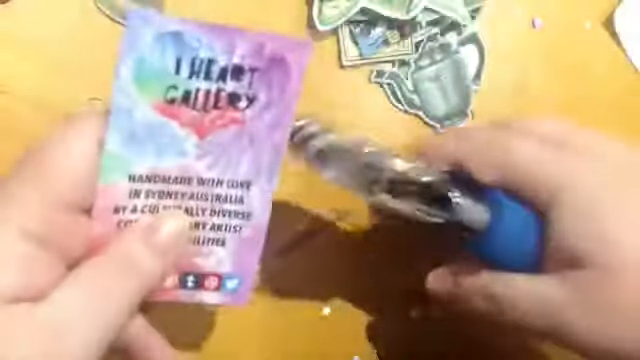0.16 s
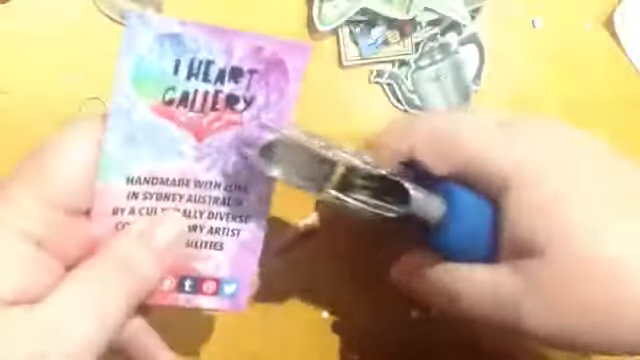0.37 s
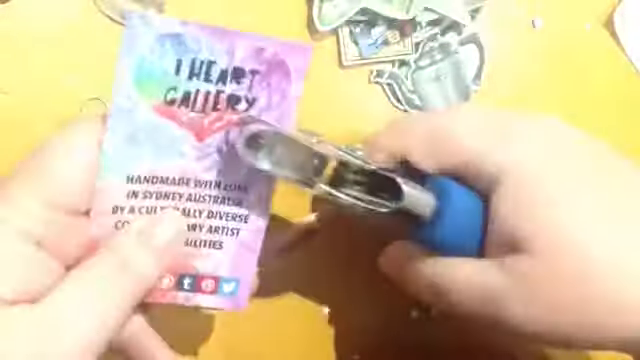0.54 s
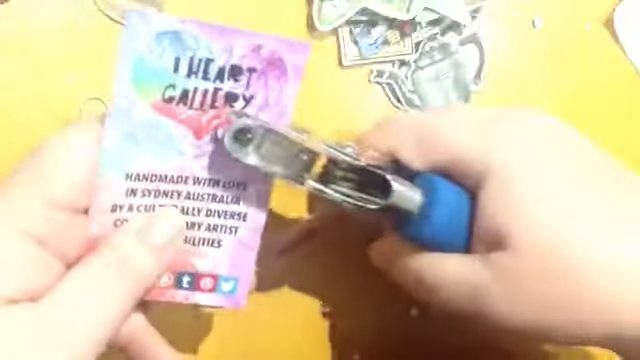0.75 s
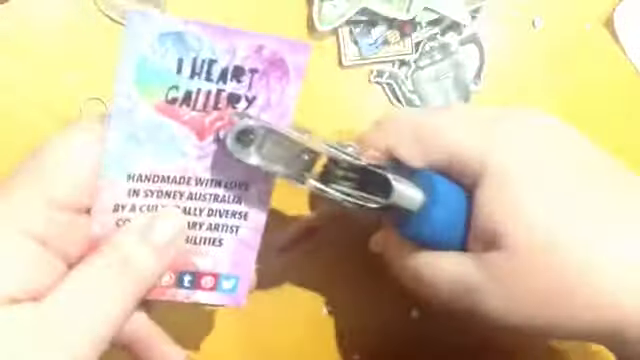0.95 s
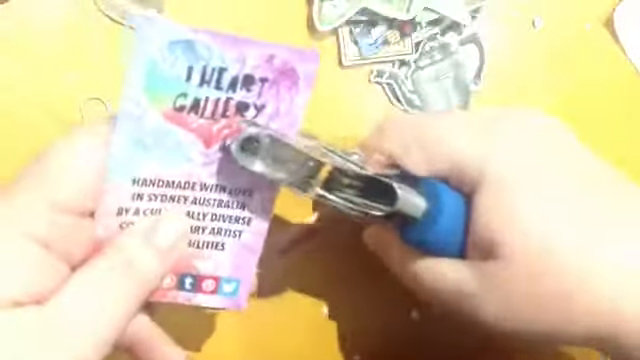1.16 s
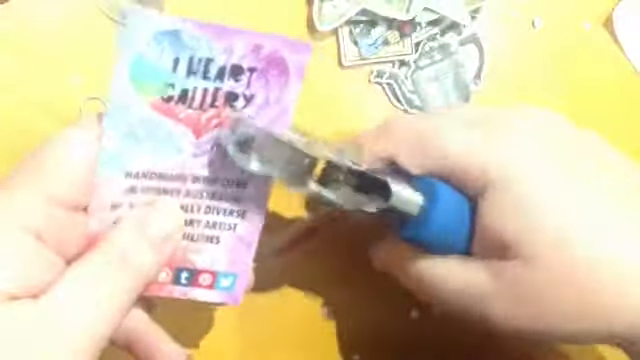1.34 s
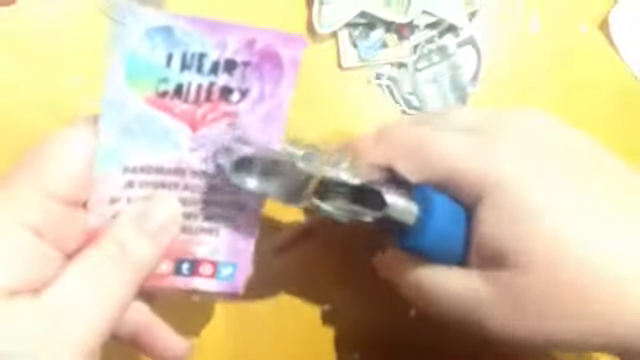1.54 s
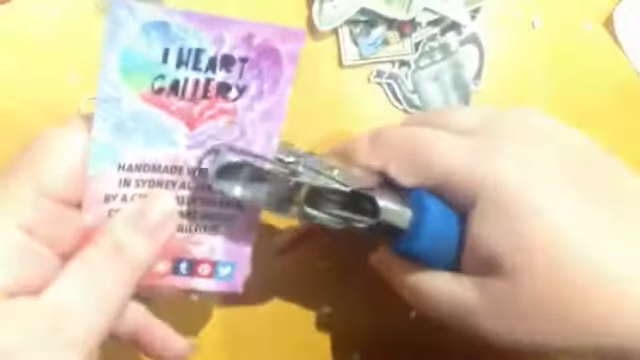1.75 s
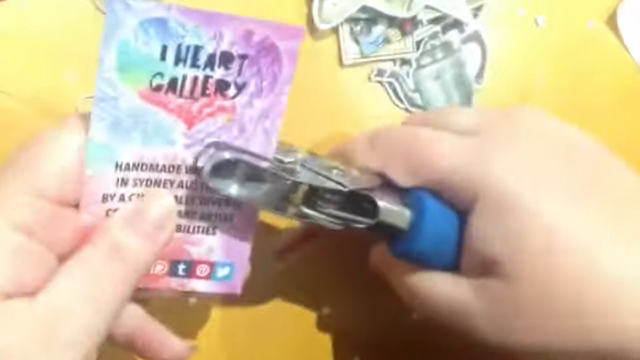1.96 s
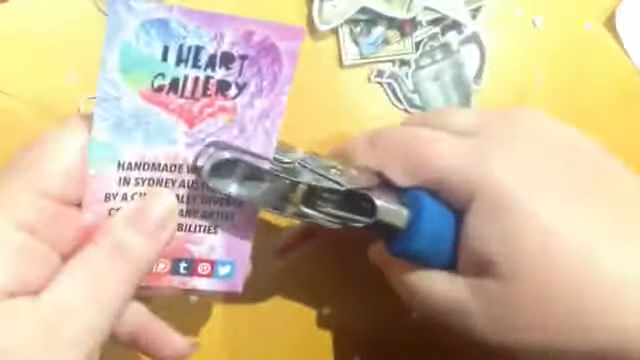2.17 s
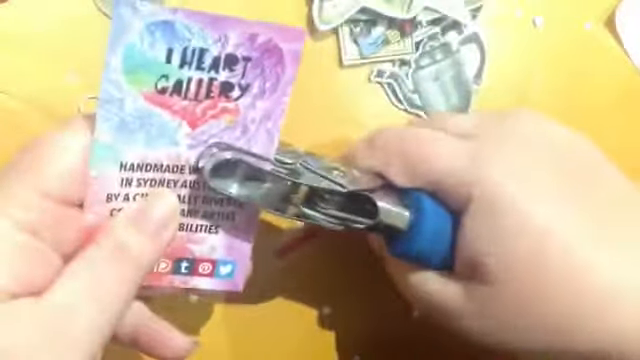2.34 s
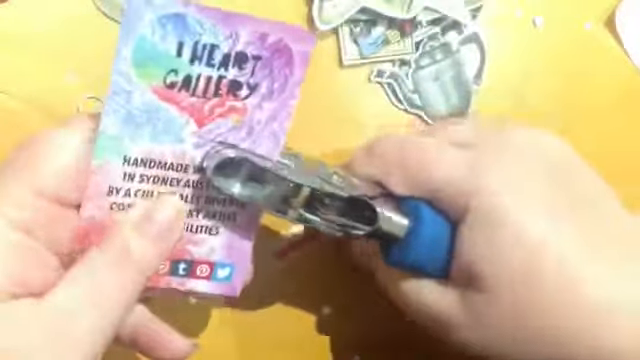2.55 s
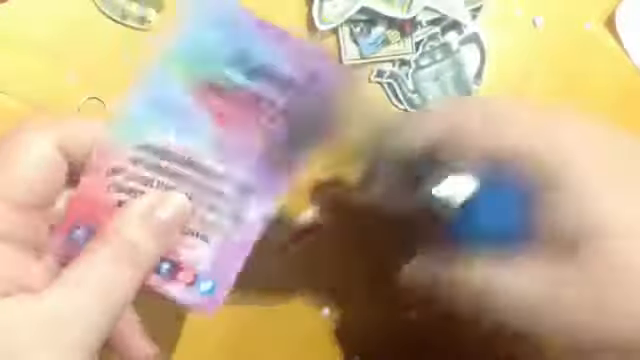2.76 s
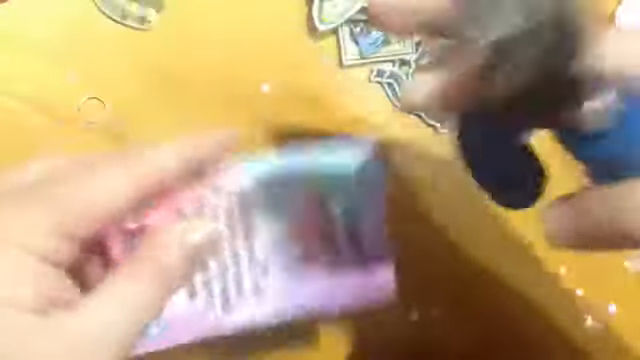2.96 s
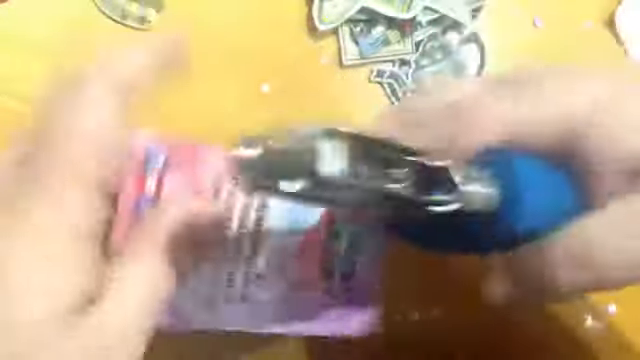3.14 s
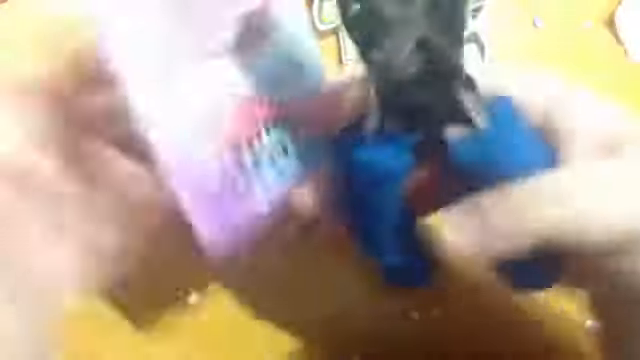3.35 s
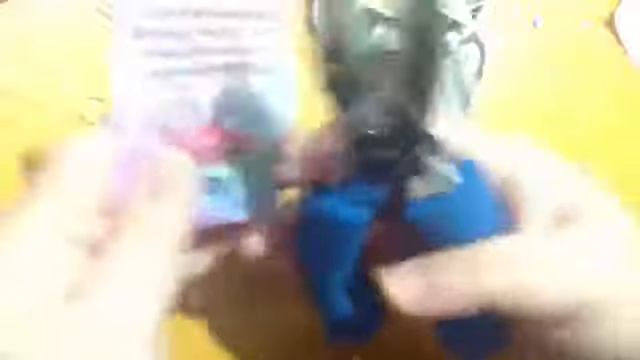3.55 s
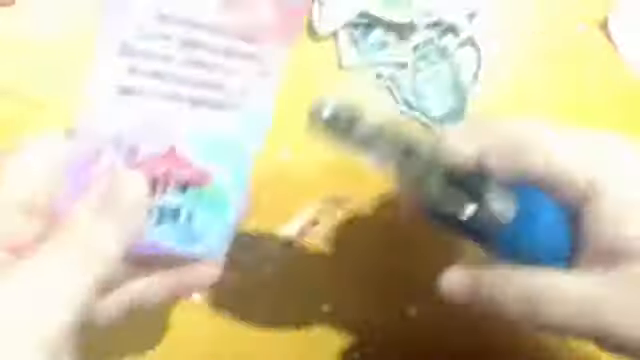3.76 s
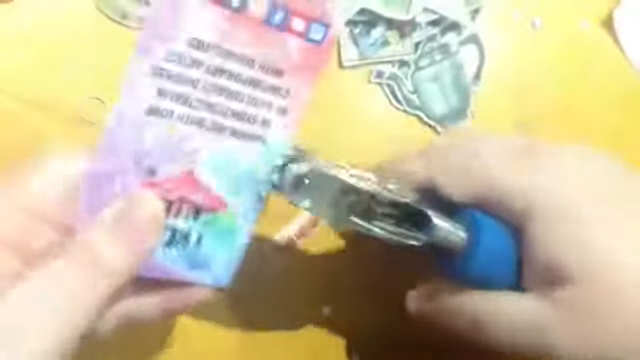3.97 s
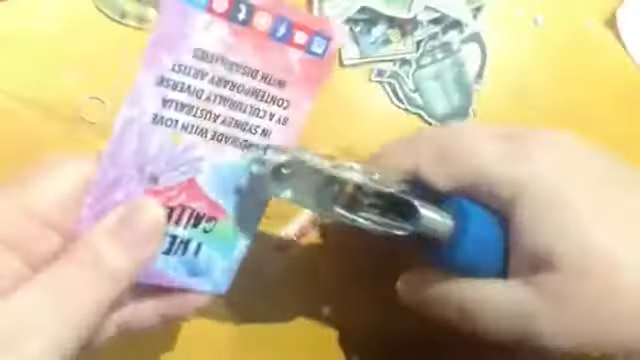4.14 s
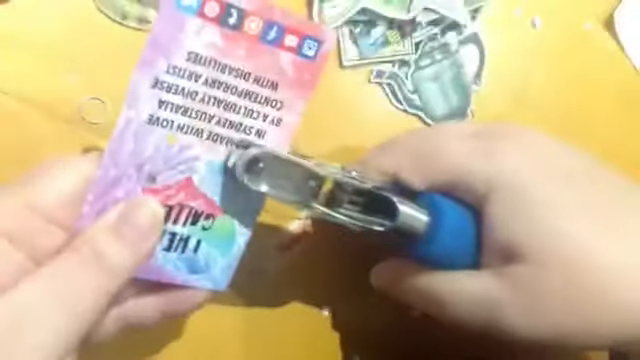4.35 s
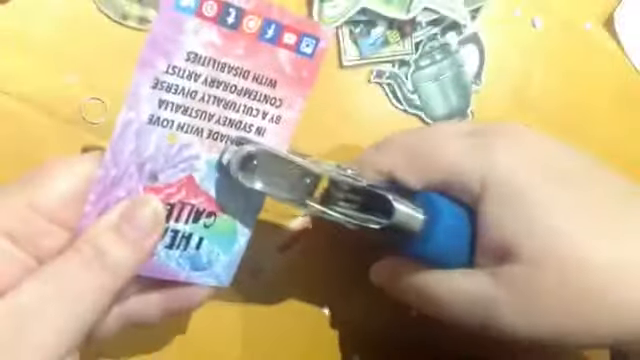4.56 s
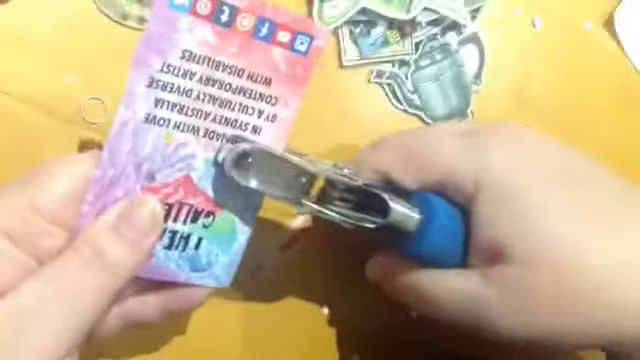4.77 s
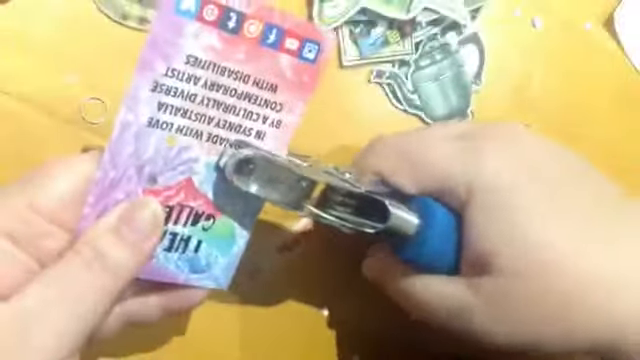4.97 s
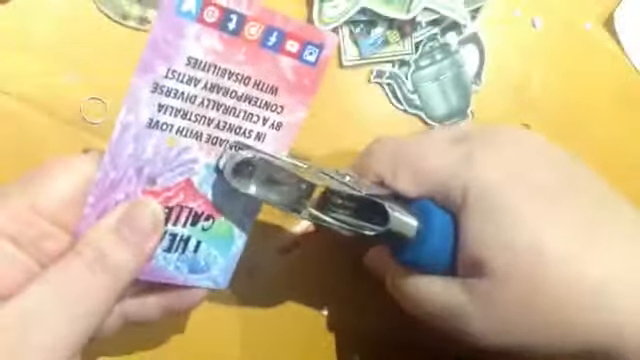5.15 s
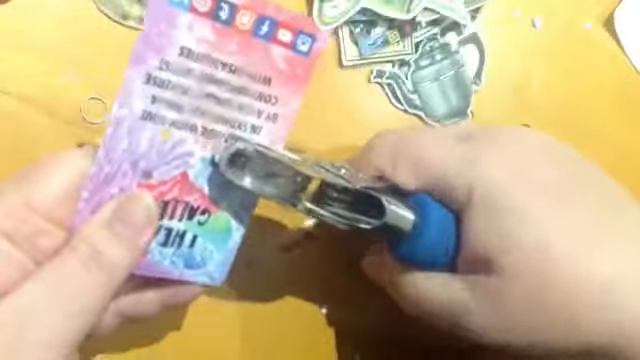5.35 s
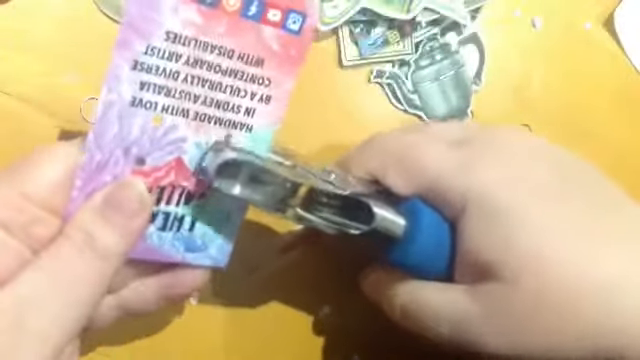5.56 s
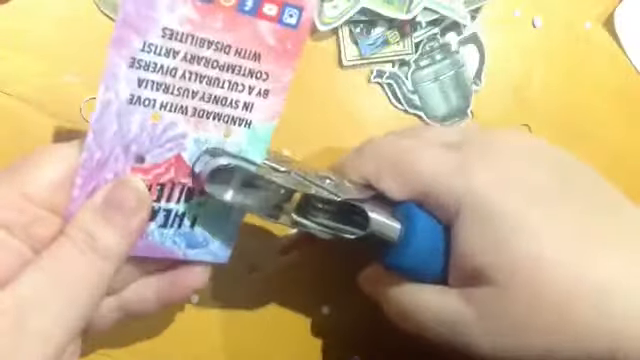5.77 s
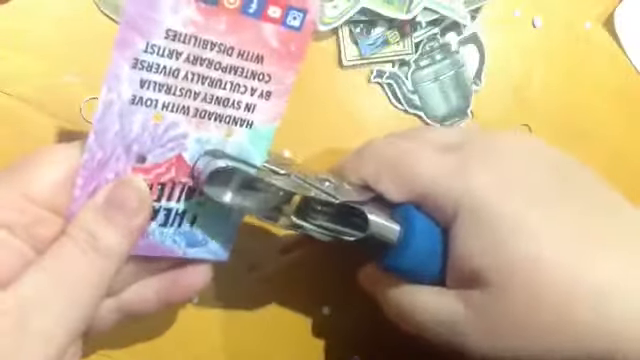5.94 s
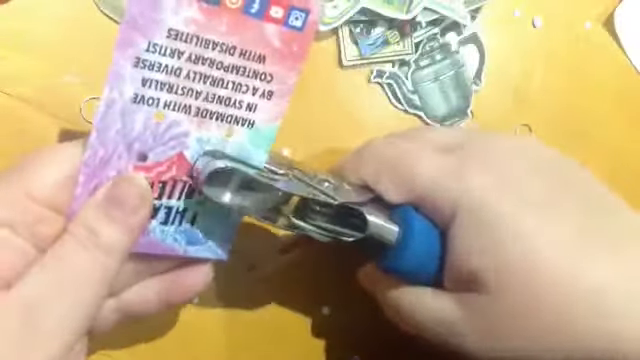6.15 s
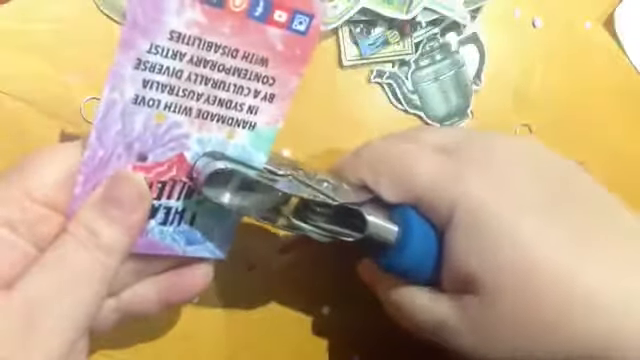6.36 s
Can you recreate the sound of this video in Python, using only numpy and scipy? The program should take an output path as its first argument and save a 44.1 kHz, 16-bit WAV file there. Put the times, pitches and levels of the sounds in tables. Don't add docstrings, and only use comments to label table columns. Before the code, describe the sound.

A close phone pickup in a small, slightly live room, over a faint low appliance drone and soft hiss. From 0 to 1 s, fingers scuff along stiff card, with tiny steel ticks and thin squeaks. At 1.1 s a hand punch slams through the card: an abrupt bright metallic clack, low hand thump and short ringing. The spring-back knock follows at about 1.3 s, small and woody. The background sinks, then slowly recovers. The loudest snap comes at 2.4 s, its fainter return at 2.6 s. From 2.6 to 4.1 s, the card is turned and rubbed with more frequent taps, flicks and light metal clicks. Sparse ticks and faint squeaks continue to about 5 s. At 5.13 s the third snap starts with a strong crisp tear, releasing at 5.3 s. Quiet hiss and a few small ticks end it near 6.3 s.

```python
import sys
import numpy as np
from scipy import signal
from scipy.fft import rfft, irfft, next_fast_len
from scipy.io import wavfile
from scipy.ndimage import uniform_filter1d, map_coordinates

SR = 44100
rng = np.random.default_rng(int(sys.argv[2]) if len(sys.argv) > 2 else 0)


def store_wav(level_fs):
    pcm = np.round(np.clip(np.atleast_2d(level_fs), -1, 1) * 32767)
    wavfile.write(sys.argv[1], SR, pcm.T.astype(np.int16))


def field_ratio(decibels):
    return 10 ** (np.asarray(decibels, dtype=float) / 20)


N = 282636

# start in seconds, peak level in dB, hand thump in dB,
# length of the tearing before it in seconds, tearing level in dB.
SNAPS = [
    (1.1094, -9.5, -24.5, .003, -27.5),
    (2.4056, -8, -19, .004, -29.5),
    (5.1335, -10, -31.5, 0.0013, -8),
]
# pitch in Hz, width in Hz, level in dB.
JAW_MODES = [
    [(3240, 52, 0), (4500, 140, -0.5), (6100, 140, -9.5), (7100, 180, -10), (8600, 120, -5.5),
     (10000, 290, -14.5), (10350, 240, -9.5), (11250, 59, -10.5), (12600, 130, -16.5), (13400, 330, -19)],
    [(3220, 67, 1), (3810, 37, -1), (4370, 100, -7.5), (5070, 1400, -7.5), (6450, 130, -14),
     (6980, 78, -9.5), (8700, 800, -13), (10800, 190, -19.5), (10600, 220, -19.5), (11900, 940, -12)],
    [(3163, 130, -1), (4620, 460, 4), (6380, 230, -8.5), (6630, 58, -9), (7400, 97, -12), (8380, 320, -6.5),
     (9364, 420, -12.5), (9340, 1000, -3), (9500, 470, -6.5), (12300, 110, -21)],
]
# pitch in Hz, width in Hz, level in dB.
HANDLE_MODES = [
    [(600, 73, -8.5), (820, 50, -1.5), (1140, 160, -5), (1860, 240, -15.5)],
    [(600, 310, -6), (850, 67, -5), (1100, 180, -2), (2050, 300, -12)],
    [(600, 120, -7.5), (875, 71, -2), (1060, 250, 0.5), (1830, 180, -4.5)],
]
# frequency in Hz, level in dB per Hz.
SNAP_COLOUR = [(88, -74), (150, -47), (230, -23), (361, -14), (622, -9), (919, -4.5), (993, 1.5),
               (1440, -18.5), (2580, -21), (3200, -7), (3960, -17), (4810, -12), (5630, -23), (13000, -25),
               (15800, -34)]
# start in seconds, peak level in dB, room level in dB.
RETURNS = [
    (1.283, -26, -27),
    (2.6, -33, -30.5),
    (5.326, -29.5, -31.5),
]
# pitch in Hz, width in Hz, level in dB.
STOP_MODES = [
    [(443, 97, -16.5), (1420, 130, -4.5), (1830, 91, -5.5), (3900, 520, -15.5), (7070, 950, -15.5),
     (10000, 460, -21), (13500, 1200, -23)],
    [(422, 150, -17), (1130, 160, -7), (1450, 96, -5), (3980, 810, 2), (6460, 1700, -7), (8440, 430, -4),
     (11700, 610, -5.5)],
    [(415, 63, -10), (1404, 220, 1.5), (1810, 220, -6.5), (3900, 440, -4.5), (6120, 200, -9),
     (8170, 460, -9.5), (12000, 2000, -17)],
]
# start in seconds, peak level in dB,
# steel pitch in Hz, bright edge in dB relative to the peak.
STEEL_TICKS = [(0.0645, -48, 3900, -12), (0.1157, -46.5, 5500, -5), (0.2221, -47.5, 5740, -3.5),
               (0.576, -64, 2830, -15), (1.6391, -67, 3520, 0.5), (2.1306, -49.5, 3900, 0),
               (2.341, -61, 5270, 1.5), (3.1422, -57, 4030, -10), (3.378, -58.5, 3900, -6),
               (3.4363, -56, 3140, -12), (3.4723, -65, 5040, 10), (3.557, -46, 5200, -13),
               (3.6114, -56, 3020, 1), (3.835, -46, 5530, -8.5), (3.9094, -60, 4370, -15.5),
               (4.0302, -49, 6250, 1), (4.4667, -51, 4070, -14), (4.4925, -50.5, 4200, -10.5),
               (5.7615, -64, 3510, -14.5), (6.159, -46.5, 4000, -0.5), (6.3021, -60.5, 4150, -14)]
# start in seconds, peak level in dB,
# card pitch in Hz, bright edge in dB relative to the peak.
CARD_TICKS = [(0.0911, -53.5, 876, 11.5), (0.299, -51.5, 1440, -12), (0.649, -51.5, 1540, -5),
              (0.9767, -58, 600, -13), (2.2622, -48.5, 1140, -33), (2.6712, -61, 2070, -11),
              (2.7276, -47, 1350, 1), (3.058, -57.5, 849, -6), (3.1153, -52, 1480, 4.5),
              (3.162, -53, 1150, -6), (3.2308, -53, 1055, -2), (3.3647, -51.5, 1256, -9),
              (3.5552, -47, 1440, -7), (4.9407, -60, 1110, -15.5), (5.052, -55, 1126, 3)]
# start in seconds, length in seconds, level in dB, pitch in Hz.
SQUEAKS = [(0.347, .06, -70, 3900), (0.63, 0.036, -72, 2720), (2.133, 0.032, -76, 3950),
           (2.663, 0.0266, -60.5, 1950), (3.85, 0.03, -78, 12100), (4.036, 0.03, -68.5, 7100),
           (4.05, 0.1, -72, 3600), (.575, 0.027, -67, 2750), (3.373, .02, -64.5, 3900),
           (3.145, 0.018, -63.5, 4100), (0.303, .025, -63, 1430), (.35, 0.077, -68, 1470),
           (4.489, 0.03, -59.5, 2780), (4.522, 0.038, -68, 2770), (4.877, 0.046, -66.5, 1400)]
# start in seconds, length in seconds,
# scratch level in dB, sheet level in dB relative to the scratch.
FLICKS = [(0.087, 0.073, -54, -15), (0.296, 0.024, -68.5, 7), (0.975, 0.084, -80.5, 13),
          (2.127, 0.04, -67, -4.5), (2.253, 0.11, -74.5, 9), (2.633, 0.1, -64.5, 0),
          (2.725, 0.044, -52.5, -7), (2.826, 0.02, -65, -13), (3.053, 0.074, -62, -3.5),
          (3.376, 0.14, -60.5, -3.5), (3.55, 0.017, -49, -15), (3.558, 0.037, -62, -6),
          (3.593, 0.059, -61, -4.5), (3.69, 0.1, -68, -6), (3.831, 0.014, -52.5, -3),
          (4.024, 0.21, -64, -4), (5.319, 0.056, -66, -0.5), (6.156, 0.015, -56.5, -14.5)]
# start in seconds,
# length in seconds, scratch level in dB, sheet level in dB relative to the scratch.
SLIDES = [(0, 0.52, -74.5, 1.5), (0.053, 0.037, -62, -6), (0.345, 0.076, -80, 1), (2.776, 0.093, -70, -3.5),
          (2.858, 0.044, -64, -1), (2.915, 0.057, -74.5, -2), (3.108, 0.083, -65, 0),
          (3.19, 0.079, -73.5, -3.5), (3.492, 0.065, -61, -18), (3.633, 0.089, -72, -15),
          (4.433, 0.59, -88.5, 14.5), (4.174, .11, -77, -4), (4.456, 0.07, -73.5, -2),
          (4.875, 0.11, -77, 10.5), (5.094, 0.028, -80, 8)]
# frequency in Hz, level in dB per Hz.
SKIN_COLOUR = [(1180, -33), (2000, -2.5), (2280, -14.5), (2480, -2.5), (2710, -4.5), (5050, -2), (7450, -4),
               (14500, -7.5), (15800, -8)]
# frequency in Hz, level in dB per Hz.
CARD_COLOUR = [(210, -20), (350, -9), (699, -0.5), (1450, -4.5), (1720, -7.5), (2720, -20), (3000, -9),
               (3900, -35.5), (6600, -120)]
# frequency in Hz, level in dB per Hz.
DRONE_COLOUR = [(15, -77.5), (25, -32), (48, -32.5), (69, -18), (102, -17), (147, -1), (160, 4),
                (263, -10.5), (340, -10), (372, -12.5), (541, -27), (687, -21.5), (900, -24.5), (1170, -58),
                (1980, -120)]
# frequency in Hz, level in dB per Hz.
HISS_COLOUR = [(290, -32), (500, -5), (814, -7.5), (1330, -7.5), (1670, -9), (2190, -10.5), (15400, -16)]
# delay in seconds, level in dB.
ECHOES = [(.0043, -15), (.0085, -16), (.012, -15.5), (.017, -25)]
# frequency in Hz, time to fall 60 dB in seconds.
ROOM_DECAY = [(150, 0.21), (400, 0.41), (1000, 0.46), (2000, 0.46), (3200, .49), (6000, 0.4), (10000, 0.49),
              (15000, 0.3)]
# frequency in Hz, level in dB.
ROOM_COLOUR = [(150, -12), (400, 3.5), (1000, 2), (2000, -2.5), (3200, -7), (5000, -5.5), (9000, 6.5),
               (15000, 4)]

TOP_HZ = 15350
GRIP_HZ = 180
RATTLE_S, SNAP_ROOM_DB = 0.0023, -0.5
STOP_CHATTER_S, STOP_CHATTER_DB = 0.00469, -17.5
HELD_CARD_HZ, HELD_CARD_DB = 1132, -12.5
HELD_STEEL_HZ, HELD_STEEL_DB = 3800, -4.5
FLICK_FADE_DB, SLIDE_SWELL_DB = -10, 4.5
LINGER_S = 0.012
DUCK_DB, DUCK_BACK_S = 10, 0.079
EARLY_DB, EARLY_S = 7.5, 0.04


def punch():
    out = np.zeros(N)
    t = np.arange(-SR // 100, SR // 20) / SR
    for (s, db, thump_db, lead, shear_db), low, high in zip(SNAPS, HANDLE_MODES, JAW_MODES):
        slam = np.clip(t / 0.0029, 0, 1) * field_ratio(-60 * np.maximum(t - RATTLE_S, 0) / 0.0081)
        shear = field_ratio(shear_db + 7 * t / lead) * (t > -lead) * (t < 0)
        damped = [(hz, width + GRIP_HZ, mode_db) for hz, width, mode_db in low + high]
        damped.append((14800, 900, -18))
        chatter = filtered((shear + slam) * rng.standard_normal(len(t)), resonances(damped))
        chatter = field_ratio(-6) * chatter / np.sqrt(np.sum(chatter ** 2) / (0.003 * SR))

        push = np.sin(np.pi * np.clip((t - 0.001) / 0.00035, 0, 1))
        hand = resonances([(110, 42, -3), (190, 85, 0), (303, 96, -0.5), (458, 170, -4.5)])
        thump = filtered(push, lambda hz: hand(hz) * field_ratio(2))

        ringing = rings(t, low + high, spread=RATTLE_S * 0.5, rise=0.00066, grip_hz=GRIP_HZ)
        steel = field_ratio(db) * chatter + field_ratio(db + 12) * ringing
        steel = filtered(steel, lambda hz: 1 - 0.45 * resonances([(1520, 500, 0)])(hz))
        add(out, s - 1 / 100, echoes(steel + field_ratio(thump_db) * thump / abs(thump).max()))

        def tint(hz):
            return 1 + field_ratio(8) * abs(resonances(high)(hz)) * (hz > 5400)

        add(out, s, field_ratio(SNAP_ROOM_DB) * filtered(tail(SNAP_COLOUR), tint))
    return out


def returns():
    out, t = np.zeros(N), np.arange(SR // 20) / SR
    for (s, db, room_db), peaks in zip(RETURNS, STOP_MODES):
        knock = rings(t, peaks, spread=0.00089, rise=0.0002, grip_hz=40)
        buzz = unit(filtered(rng.standard_normal(len(t)), resonances([(9000, 13000, 0)])))
        buzz = buzz * np.sin(np.pi * np.clip(t / STOP_CHATTER_S, 0, 1))
        add(out, s, echoes(field_ratio(db) * knock / abs(knock).max()))
        add(out, s - 0.0006, echoes(field_ratio(db + STOP_CHATTER_DB) * buzz))
        add(out, s, field_ratio(room_db) * tail([(hz, mode_db) for hz, width, mode_db in peaks]))
    return out


def ticks():
    out, t = np.zeros(N), np.arange(SR // 20) / SR
    contacts = [(s, db, hz, 0, HELD_CARD_HZ, HELD_CARD_DB, edge_db) for s, db, hz, edge_db in STEEL_TICKS]
    contacts += [(s, db, HELD_STEEL_HZ, HELD_STEEL_DB, hz, 0, edge_db) for s, db, hz, edge_db in CARD_TICKS]
    for s, db, steel_hz, steel_db, card_hz, card_db, edge_db in contacts:
        jolt = rng.standard_normal(len(t)) * field_ratio(-60 * t / 0.007) * (1 - np.exp(-t / 0.0002))
        parts = [(steel_hz, 1100, steel_db), (card_hz, 600, card_db), (8000, 11000, edge_db)]
        tick = 0
        for hz, width, level_db in parts:
            mode = resonances([(hz, width, 0)])
            part = filtered(jolt, lambda f: mode(f) ** 2)
            tick = tick + field_ratio(db + level_db + 4) * part / abs(part).max()
        add(out, s, echoes(tick))
        add(out, s, field_ratio(-13.5) * signal.fftconvolve(tick, tail(ROOM_COLOUR)))
    return out


def spring():
    out = np.zeros(N)
    for s, length, db, hz in SQUEAKS:
        u = np.arange(round(length * SR)) / (length * SR)
        note = unit(filtered(rng.standard_normal(len(u)), resonances([(hz, 130, 0)])))
        fade = np.clip(8 * np.minimum(u * 3, 1 - u), 0, 1)
        add(out, s, field_ratio(db - 3.2 * u) * fade * note)
    return out


def rubbing():
    slips_db = 1.6 * wobble(150) + 1.1 * wobble(50)
    bright, dull = np.zeros(N), np.zeros(N)
    strokes = [(*row, FLICK_FADE_DB) for row in FLICKS] + [(*row, SLIDE_SWELL_DB) for row in SLIDES]
    for s, length, db, sheet_db, change_db in strokes:
        u = np.arange(round(length * SR)) / (length * SR)
        fade = np.clip(np.minimum(u * length / 0.003, (1 - u) / 0.35), 0, 1)
        shape = field_ratio(db + change_db * u) * fade
        add(bright, s, shape)
        add(dull, s, field_ratio(sheet_db) * shape)
    bright, dull = lingering(bright), lingering(dull)
    scratch = patchy(noise(SKIN_COLOUR, grain_db=2.5), depth_db=2.6)
    sheet = patchy(noise(CARD_COLOUR, grain_db=3), depth_db=3.2)
    return field_ratio(slips_db) * (bright * scratch + dull * sheet)


def background():
    since = [np.maximum(np.arange(N) / SR - snap[0], 0) for snap in SNAPS]
    gain_db = -np.max([13 * (1 - np.exp(-t / 0.051)) * np.exp(-t / 1.1) for t in since], axis=0)
    duck_db = -DUCK_DB * sum((t > 0) * np.exp(-t / DUCK_BACK_S) for t in since)
    drone = field_ratio(-63 + duck_db + 1.6 * wobble(3.9)) * noise(DRONE_COLOUR)
    hiss = field_ratio(-67.5) * noise(HISS_COLOUR)
    return field_ratio(gain_db) * (drone + hiss)


def echoes(x):
    answer = np.zeros(SR // 40)
    answer[0] = 1
    for s, db in ECHOES:
        smear = rng.random(5) - 0.3
        add(answer, s, field_ratio(db - 8.5) * smear / np.linalg.norm(smear))
    return signal.fftconvolve(x, answer)


def tail(colour):
    hz, t, z = signal.stft(rng.standard_normal(SR * 3 // 4), SR, nperseg=384)
    decay_db = -60 * t / along(ROOM_DECAY, hz)[:, None]
    early_db = EARLY_DB * np.exp(-t / EARLY_S)
    gain = field_ratio(along(colour, hz)[:, None] + decay_db + early_db) * (hz < TOP_HZ)[:, None]
    uneven = unit(smoothed(rng.standard_normal(z.shape), bands=4, frames=9))
    wash = signal.istft(z * gain * field_ratio(1.5 * uneven), SR, nperseg=384)[1]
    wash = wash * np.clip(np.arange(len(wash)) / SR / 0.0014, 0, 1) ** 2
    return wash / np.linalg.norm(wash)


def radiated(x, cut_hz):
    return filtered(x, lambda hz: (1j * hz / (cut_hz + 1j * hz)) ** 2)


def rings(t, peaks, spread, rise, grip_hz):
    out = 0
    for (hz, width, mode_db), (late, turn) in zip(peaks, rng.random((len(peaks), 2))):
        u = np.maximum(t - late * spread, 0)
        swell = (1 - np.exp(-u / rise)) ** 2 * np.exp(-np.pi * (width + grip_hz) * u)
        tone = np.sin(2 * np.pi * (hz * u + turn))
        out = out + field_ratio(mode_db) * np.sqrt(width / 200) * swell * tone
    return out


def resonances(peaks):
    def response(f):
        total = 0
        for k, (c, w, db) in enumerate(peaks):
            total = total + (-1) ** k * field_ratio(db) * 1j * f * w / (c * c - f * f + 1j * f * w)
        return total
    return response


def lingering(level):
    keep = np.exp(-1 / (LINGER_S * SR))
    return np.maximum(level, field_ratio(-2) * signal.lfilter([1 - keep], [1, -keep], level))


def patchy(x, depth_db):
    z = signal.stft(x, nperseg=256)[2]
    field = unit(smoothed(rng.standard_normal(z.shape), bands=5, frames=7))
    return unit(signal.istft(z * field_ratio(depth_db * field), nperseg=256)[1][:N])


def smoothed(field, bands, frames):
    return uniform_filter1d(uniform_filter1d(field, size=bands, axis=0), size=frames, axis=1)


def noise(spectrum, grain_db=0):
    grain = field_ratio(grain_db * np.minimum(rng.exponential(size=N), 4))
    white = rng.standard_normal(N) * grain
    return unit(filtered(white, lambda hz: field_ratio(along(spectrum, hz)) * (hz < TOP_HZ)))


def wobble(rate):
    knots = rng.standard_normal(int(N * rate / SR) + 4)
    return map_coordinates(knots, [np.arange(N) * rate / SR])


def filtered(x, response):
    m = next_fast_len(len(x) + 8192)
    return irfft(rfft(x, m) * response(np.fft.rfftfreq(m, 1 / SR)), m)[:len(x)]


def along(points, hz):
    f, v = np.transpose(points)
    return np.interp(np.log(hz + 1), np.log(f + 1), v)


def unit(x):
    return x / np.sqrt(np.mean(x ** 2) + 1e-20)


def add(track, s, sound):
    part = track[round(s * SR):][:len(sound)]
    part += sound[:len(part)]


def scene():
    snaps = radiated(punch(), cut_hz=41)
    knocks = radiated(returns(), cut_hz=120)
    return (snaps + knocks + ticks() + spring() + rubbing() + background())[None]


def roll_off(x):
    return signal.sosfilt(signal.butter(12, 16540, fs=SR, output="sos"), x)


def record(dry):
    held = dry[0] / (1 + abs(dry[0] / 0.8) ** 6) ** (1 / 6)
    mix = filtered(held, lambda hz: field_ratio(-np.clip(hz - TOP_HZ, 0, 2000) * 0.025))
    return roll_off(mix[None])


dry = scene()
out = record(dry)
store_wav(out)
```